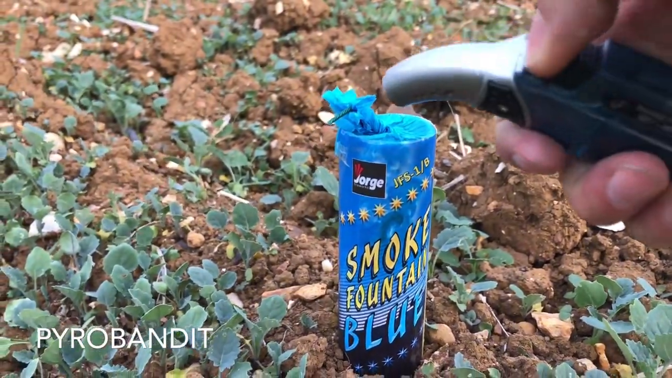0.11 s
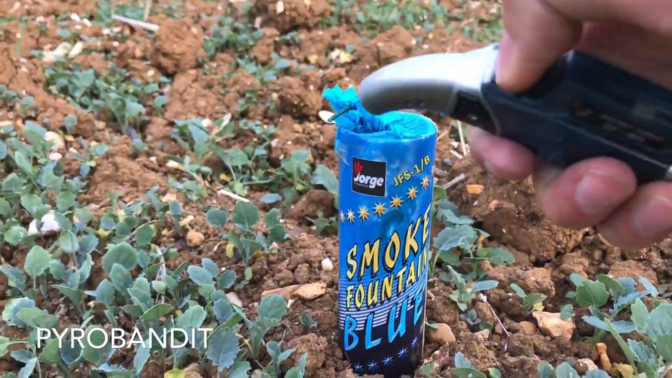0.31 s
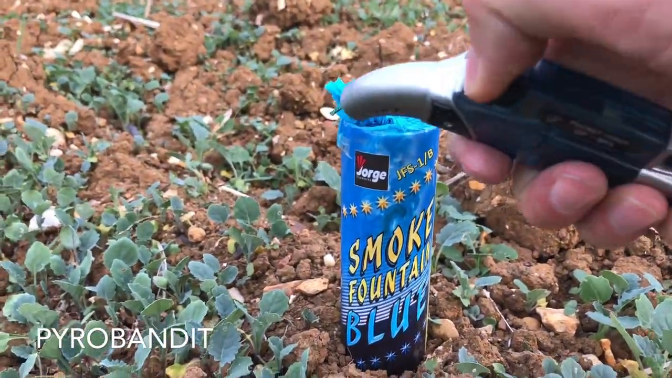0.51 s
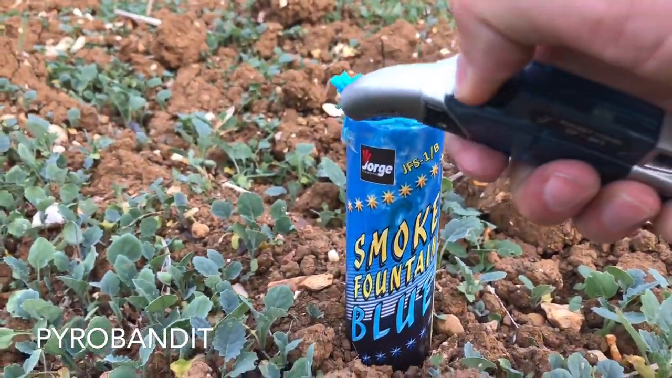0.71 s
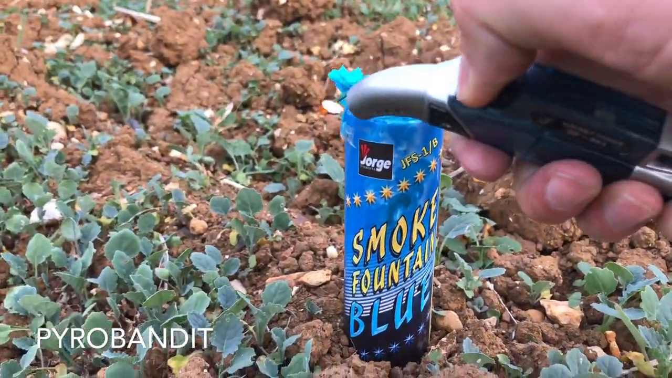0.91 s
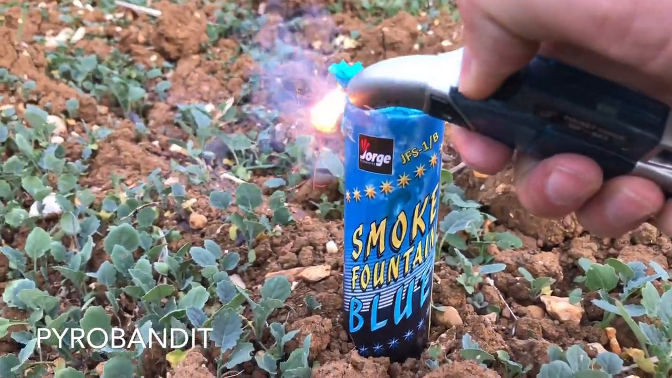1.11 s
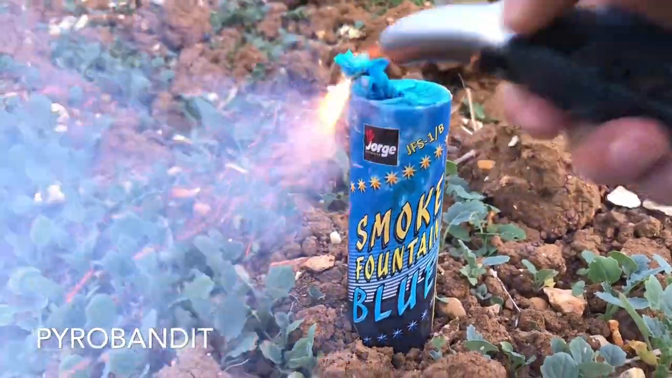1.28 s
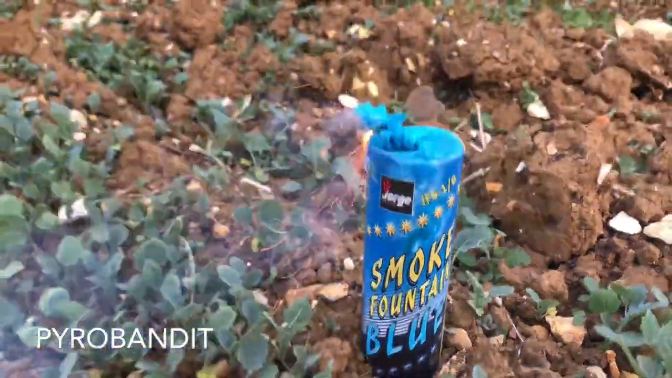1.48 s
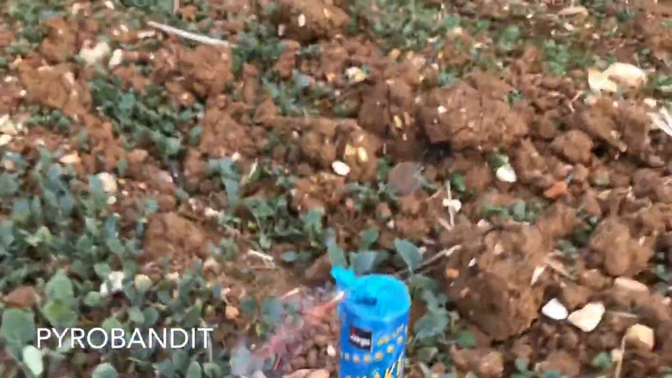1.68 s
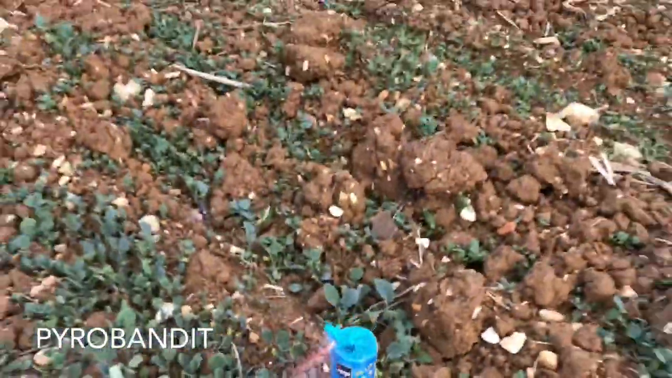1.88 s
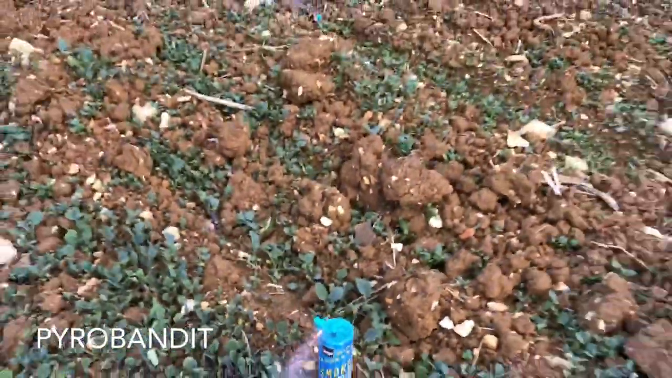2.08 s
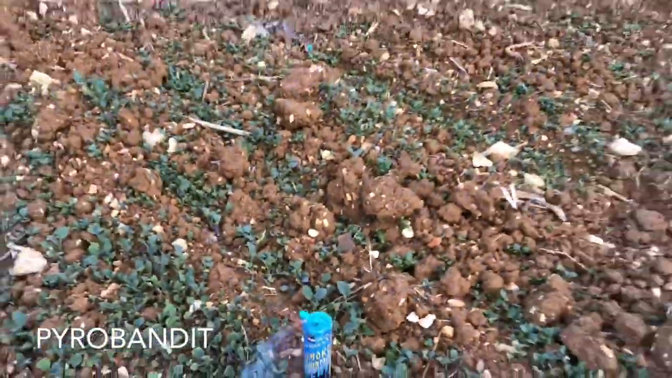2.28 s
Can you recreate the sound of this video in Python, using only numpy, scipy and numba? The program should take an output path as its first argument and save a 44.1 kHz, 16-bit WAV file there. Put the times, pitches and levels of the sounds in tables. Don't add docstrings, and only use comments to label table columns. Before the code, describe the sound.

A gas torch lighter snaps on and roars, lighting a firework fuse that sputters and sizzles outdoors

```python
import sys
import numpy as np
from scipy import signal
from scipy.fft import rfft, irfft
from scipy.io import wavfile
from scipy.ndimage import uniform_filter1d, map_coordinates
from numba import njit

SR = 44100
rng = np.random.default_rng(int(sys.argv[2]) if len(sys.argv) > 2 else 0)


def to_wav(sig):
    pcm = np.clip(np.atleast_2d(sig), -1, 1) * 32767
    pcm = np.round(pcm).astype(np.int16)
    wavfile.write(sys.argv[1], SR, pcm.T)


def voltage_ratio(level):
    return 10 ** (np.asarray(level, float) / 20)


N = 105840
TIME_S = np.arange(N) / SR
LIT_S, VALVE_SHUT_S = 0.258, 1.375

# [f/Hz, density level/dB]
CRACKLE_SPECTRUM = [(300, -32.5), (1500, -5.5), (4000, 6.5), (8000, -3.5), (10000, -6), (15600, -20.5)]
# [t/s, lower notch f/Hz, upper notch f/Hz, depth 0-1]
HAND = [(.26, 9800, 11500, 1), (.6, 10300, 12000, 0.9), (.68, 11200, 13200, 0.4), (.9, 10900, 13200, 0.3),
        (1.02, 11000, 12500, .6), (1.18, 11200, 12200, .55), (1.24, 10100, 10600, 0.3),
        (1.33, 8760, 10000, 0.5), (1.43, 8160, 12200, 0.6), (1.48, 8000, 11900, 0)]


@njit
def svf(x, hz, width):
    y, band, low = np.empty(len(x)), 0., 0.
    for i in range(len(x)):
        g = np.tan(np.pi * hz[i] / SR)
        k = width / hz[i]
        v = (band + g * (x[i] - low)) / (1 + g * (g + k))
        band, low = 2 * v - band, low + 2 * g * v
        y[i] = k * v
    return y


def curve(table, column=1):
    rows = np.array(table, float)
    return np.interp(TIME_S, rows[:, 0], rows[:, column])


def walk(rate):
    hold = int(SR / rate)
    steps = np.repeat(rng.standard_normal(N // hold + 1), hold)
    smooth = uniform_filter1d(uniform_filter1d(steps, hold), hold)[:N]
    return (smooth - smooth.mean()) / smooth.std()


def colour(x, shape, flicker_db=0., rate=15.1, count=1):
    rows = np.array(shape, float)
    octave = np.log2(np.fft.rfftfreq(N, 1 / SR) + 1)
    spectrum = rfft(x) * voltage_ratio(np.interp(octave, np.log2(rows[:, 0]), rows[:, 1], left=-60))
    if flicker_db == 0:
        out = irfft(spectrum, N)
    else:
        out = np.zeros(N)
        for centre in range(int(count * np.log2(rows[0, 0])) - 1, 15 * count):
            share = np.clip(1 - abs(count * octave - centre), 0, 1)
            out = out + irfft(spectrum * share, N) * voltage_ratio(flicker_db * walk(rate))
    return out / out.std()


def gate(start, stop, rise, fall):
    return np.clip((TIME_S - start) / rise, 0, 1) * np.clip(1 - (TIME_S - stop) / fall, 0, 1)


def decay(samples, t60):
    return np.exp(-np.log(1000) * np.arange(samples) / SR / t60)


def ring(hz, t60):
    return np.sin(2 * np.pi * hz * np.arange(2000) / SR) * decay(2000, t60)


def struck(modes):
    return sum((-1) ** k * voltage_ratio(db) * ring(hz, t60) for k, (hz, db, t60) in enumerate(modes))


def sparks(rate, spread_db, t60):
    hits = (rng.random(N) < rate / SR) * voltage_ratio(spread_db * rng.exponential(size=N))
    return signal.fftconvolve(hits, decay(600, t60))[:N] * rng.standard_normal(N)


def cut_bass(x, hz, order):
    return signal.sosfilt(signal.butter(order, hz, "high", fs=SR, output="sos"), x)


def at(s, x):
    i = int(s * SR)
    return np.concatenate([np.zeros(max(i, 0)), x[max(-i, 0):], np.zeros(N)])[:N]


def flame():
    # [t/s, roar level/dB, crackle level/dB]
    levels = [
        (.258, -42.5, -64),
        (.39, -43.5, -69),
        (.42, -42.5, -53),
        (.52, -43.5, -55),
        (.63, -43, -57.5),
        (.75, -41.5, -51),
        (.94, -47, -61),
        (1.15, -48.5, -49.5),
        (1.375, -34, -58),
    ]
    # [f/Hz, density level/dB]
    roar_spectrum = [(80, -8.5), (250, -3.5), (700, -4), (1400, -1), (2500, -4), (4200, -2.5), (6000, -14),
                     (12000, -19.5)]
    roar = colour(rng.standard_normal(N), roar_spectrum, flicker_db=0.8)
    roar = roar * voltage_ratio(curve(levels) + 1.45 * walk(89.85))
    crackle = colour(sparks(rate=150, spread_db=0.5, t60=0.0059), CRACKLE_SPECTRUM)
    crackle = crackle * voltage_ratio(curve(levels, column=2) + 1.2 * walk(60.0))
    return (roar + crackle + pops()) * gate(LIT_S, VALVE_SHUT_S, 0.001753, 0.024)


def pops():
    # [t/s, peak level/dB]
    bursts = [(0.2846, -39), (0.289, -43), (0.3147, -43), (0.321, -42), (0.331, -40), (0.3425, -40),
              (0.3681, -43), (0.3874, -43), (0.4, -37.5), (0.411, -40), (0.4227, -40), (0.4294, -38),
              (0.436, -45), (0.4504, -43), (0.482, -41), (0.4983, -40), (0.521, -38.5), (0.645, -44),
              (0.6917, -40)]
    gain_db, t60_s = 3, 0.0072
    envelope = sum(at(s, voltage_ratio(db + gain_db) * decay(800, t60_s)) for s, db in bursts)
    return colour(rng.standard_normal(N), CRACKLE_SPECTRUM) * envelope


def fuse():
    # [t/s, level/dB, sizzle brightness/dB]
    burning = [(.95, -62, 7), (1.06, -52.5, 0.5), (1.14, -40.5, 0.5), (1.3, -36, -10.5), (1.36, -37, -4),
               (1.43, -32.5, -5.5), (1.5, -33.5, 2), (1.57, -34, 0.5), (1.64, -36.5, 1), (1.7, -35.5, 5.5),
               (1.78, -37, 5), (1.85, -37.5, 3), (1.97, -39.5, 4), (2.0, -40.5, -1), (2.12, -41, 3.5),
               (2.23, -46, 1.5), (2.29, -43, 1.5), (2.4, -46, 3.5)]
    # [f/Hz, density level/dB]
    jet_spectrum = [(120, -3.5), (330, -2), (700, -6), (1900, -1), (3300, -1), (5000, -3.5), (8000, -13.5)]
    # [f/Hz, density level/dB]
    sizzle_spectrum = [(1500, -25), (4000, -4), (6500, -1), (9500, -1), (13000, -1.5), (15600, -2)]
    # [t/s, boost level/dB, length/s]
    spits = [
        (1.026, 7, 0.00644),
        (1.045, 8.5, 0.003344),
        (1.058, 5, 0.001893),
        (1.072, 8.5, 0.0065),
        (1.097, 2, 0.00485),
        (1.108, 2.5, 0.0067),
    ]
    # [f/Hz, width/Hz, gain level/dB, from t/s, to t/s]
    mouth = [(4150, 500, -2.5, 1.31, 1.52), (6300, 1170, -1.5, 1.12, 1.63), (1560, 200, 1, 1.27, 1.37),
             (396, 430, 0.5, 1.126, 1.425), (3100, 740, -11.5, 1.73, 2.15)]

    jet = colour(rng.standard_normal(N), jet_spectrum, flicker_db=0.73, rate=12.0)
    fizz = rng.standard_normal(N) + 0.2831 * sparks(rate=1500, spread_db=3.7, t60=0.002202)
    sizzle = colour(fizz, sizzle_spectrum, flicker_db=1.2, rate=22., count=4)
    sizzle = sizzle * voltage_ratio(0.5 + curve(burning, column=2) + 1.03 * walk(40.02))
    source = jet + sizzle
    body = source
    for hz, width, db, start, stop in mouth:
        resonance = svf(source, hz * (1 + 0.019 * walk(10.5)), 1. * width)
        body = body + gate(start, stop, 0.14, 0.11) * voltage_ratio(db + 1.7 * walk(17.7)) * resonance
    spit_db = sum(db * np.exp(-((TIME_S - s) / span) ** 2) for s, db, span in spits)
    level = voltage_ratio(curve(burning) - 1.5 + spit_db + 0.81 * walk(110))
    return body * level * gate(burning[0][0], 3., 0.06417, .1)


def nozzle_gas():
    # [f/Hz, density level/dB]
    gas_spectrum = [(1000, -23), (4500, -20.5), (5200, -11), (6000, -14.5), (7900, -0.5), (9400, -8),
                    (10300, -21.5), (15600, -5)]
    # [f/Hz, width/Hz, level/dB]
    whistles = [
        (12800, 1370, -71.5),
        (14300, 1800, -66),
        (15400, 1200, -68),
    ]
    valve_open_s, gas_db = 0.087, -53
    lit_gas_db, lit_whistle_db = -15, 5
    drift_exponent = 0.43

    lit = gate(LIT_S, VALVE_SHUT_S, 0.001753, 0.024)
    level = voltage_ratio(gas_db + lit_gas_db * gate(LIT_S, 3., 0.022, .1))
    gas = level * colour(rng.standard_normal(N), gas_spectrum)
    edge = curve(HAND, column=2)
    drift = (edge / edge[0]).clip(1, 1.2) ** drift_exponent
    for hz, width, db in whistles:
        centre = hz * drift * (1 + 0.01022 * walk(9.006))
        band = svf(svf(rng.standard_normal(N), centre, 1. * width), centre, 1. * width)
        band = band * voltage_ratio(1.5 * walk(14.3))
        gas = gas + voltage_ratio(db + lit_whistle_db * lit) * band / band.std()
    return gas * gate(valve_open_s, VALVE_SHUT_S, 0.022, 0.01015)


def trigger():
    # [t/s, level/dB, soil echo level/dB]
    ticks = [
        (.001, -58, -7),
        (.0943, -60, -7.5),
        (.1645, -46, -7),
        (.2243, -36, -3.5),
        (.2360, -42, -3),
        (.2715, -42, -11.5),
        (0.2462, -42, -7.5),
        (0.24737, -14, -9),
        (0.24768, -4.5, -4),
    ]
    # [f/Hz, level/dB, t60/s]
    shell = [(1634, -8.5, 0.013), (2100, -6, 0.0042), (3000, -11, 0.0055), (4360, -4.5, 0.0098),
             (5160, -3.5, 0.0042), (6450, -1, 0.0041), (8430, -9.5, 0.0048), (9530, -13, 0.0044),
             (10800, -13.5, .004), (11500, -9.5, 0.0038), (13000, -9, 0.0036), (14250, -19, 0.004),
             (15450, -17, .005)]
    # [f/Hz, level/dB, t60/s]
    release = [(2020, -6.5, .006), (4120, -7, 0.021), (5200, -9, .004), (6800, -2.5, .005),
               (7950, -3, .003), (11700, -8, .003), (14700, -3, 0.0044)]
    echo_s = 0.00059447
    release_s, release_db, release_echo_db = 1.3751, -15.5, -13

    spring = ring(hz=3110, t60=0.0683)[:int(.011 * SR)]
    clicks = at(0.2362, voltage_ratio(-48) * spring)
    body = struck(shell)
    for s, db, echo_db in ticks:
        clicks = clicks + voltage_ratio(db) * (at(s, body) + voltage_ratio(echo_db) * at(s + echo_s, body))
    back = voltage_ratio(release_db) * struck(release)
    clicks = clicks + at(release_s, back) + voltage_ratio(release_echo_db) * at(release_s + echo_s, back)
    thud = at(.2479, voltage_ratio(-27.5) * ring(hz=560, t60=.004))
    return thud + cut_bass(clicks, 1012.5, order=2)


def shadow(x):
    # [t/s, f/Hz, depth 0-1]
    tube = [(.26, 4360, 1), (.62, 4800, 1), (.7, 5130, 0.5), (1.0, 5440, 0.9), (1.19, 5380, 0.94),
            (1.25, 5181, 0.5), (1.42, 5100, 0.37), (1.6, 4600, 0.36), (2.0, 4150, 0.34), (2.4, 4260, 0.26)]
    soil_lag_s, soil_wander_s, soil_db = 0.000938, .00004, -23.5
    tube_width_hz, hand_width_hz, waver = 1050., 2000., 0.11
    fixed_hz, fixed_width_hz, fixed_depth = 3190., 580., 0.62

    lag = soil_lag_s + soil_wander_s * walk(5.1)
    x = x + voltage_ratio(soil_db) * map_coordinates(x, [(TIME_S - lag) * SR], order=3, mode="nearest")
    depth = np.clip(curve(tube, column=2) - .06 + waver * walk(25.1), 0, 1)
    x = x - depth * svf(x, curve(tube) * (1 + 0.005735 * walk(11.3)), tube_width_hz)
    for edge in (curve(HAND), curve(HAND, column=2)):
        depth = np.clip(curve(HAND, column=3) + waver * walk(24.6), 0, 1)
        x = x - depth * svf(x, edge, hand_width_hz)
    return x - fixed_depth * gate(0, 1.45, .01, 0.23) * svf(x, np.full(N, fixed_hz), fixed_width_hz)


def wind():
    # [t/s, level/dB]
    breeze = [(0, -48.5), (.33, -52.5), (.4, -66), (.55, -55.5), (.77, -56.5), (.82, -64), (1.05, -59),
              (1.3, -55.5), (1.5, -61), (1.6, -48.5), (1.95, -60), (2.2, -59), (2.28, -56), (2.4, -67.5)]
    # [f/Hz, density level/dB]
    rumble_spectrum = [(20, -31), (40, -6), (70, -2.5), (120, -4.5), (200, -9.5), (320, -28.5), (700, -68)]
    # [t/s, peak level/dB, f/Hz]
    puffs = [(0.017, -35, 90), (0.047, -41, 130.9), (0.065, -43, 94.17), (0.088, -35, 120),
             (0.154, -34, 201.1), (0.215, -38, 79.24), (0.263, -46, 117.5), (0.301, -39.5, 106.6),
             (0.337, -42.5, 206), (0.558, -41, 121.1), (0.703, -40.5, 93.07), (0.751, -35.5, 228),
             (1.65, -40, 133.3), (1.68, -31.5, 188), (1.702, -32, 229), (1.797, -33, 95), (1.816, -59, 193),
             (1.837, -48, 94.28), (1.878, -32, 110), (1.908, -41, 116.9), (1.934, -48, 115.3),
             (1.951, -25, 240), (1.967, -29, 93.61), (2.001, -35, 450), (0.123, -41, 110),
             (0.166, -41, 110), (0.08, -46, 298), (0.761, -39.5, 100), (2.017, -46, 117.4),
             (2.039, -40.5, 133.6), (2.1, -31, 144.4), (2.116, -38, 123), (2.153, -34.5, 182.8),
             (2.254, -43, 121), (2.28, -41, 190), (2.29, -49, 160), (0.605, -45, 70), (1.866, -37.5, 190),
             (1.785, -39, 330), (2.087, -40, 130), (0.772, -45, 70)]
    rise, fall, sag = 0.45, 1.15, 0.49

    out = colour(rng.standard_normal(N), rumble_spectrum, flicker_db=2.0, rate=9.784)
    out = out * voltage_ratio(curve(breeze) + 3.64 * walk(30.12))
    phases = 0.073 + 0.069 * rng.standard_normal(len(puffs))
    before = 2000
    for (s, db, hz), phase in zip(puffs, phases):
        cycles = np.arange(-before, 2500) / SR * hz
        swell = np.exp(-(cycles / np.where(cycles < 0, rise, fall)) ** 2)
        turns = np.cumsum(np.exp(-sag * np.clip(cycles, -1, 3))) * hz / SR
        push = swell * np.cos(2 * np.pi * (turns - turns[before] + phase))
        out = out + at(s - before / SR, voltage_ratio(db) * push)
    return out


def open_field():
    # [f/Hz, density level/dB]
    field_spectrum = [(180, -26), (300, -7), (315, -12), (674, -21.5), (1200, -19), (15600, -42.5)]
    return voltage_ratio(-65) * colour(rng.standard_normal(N), field_spectrum)


def scene():
    burning = shadow(flame() + fuse())
    mono = burning + nozzle_gas() + trigger() + wind() + open_field()
    return np.array([mono, mono])


def roll_off(x):
    return signal.sosfilt(signal.butter(12, 17040, fs=SR, output="sos"), x)


def record(dry):
    wet = cut_bass(dry, 35, order=2)
    wet = signal.sosfilt(signal.ellip(10, .2, 60, 15750, fs=SR, output="sos"), wet)
    return roll_off(wet)


dry = scene()
out = record(dry)
to_wav(out)
```